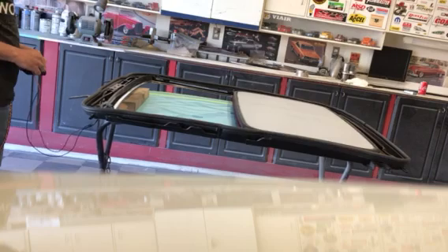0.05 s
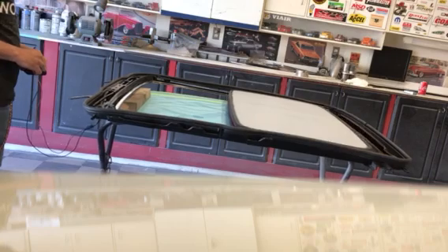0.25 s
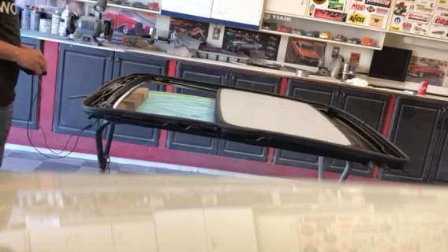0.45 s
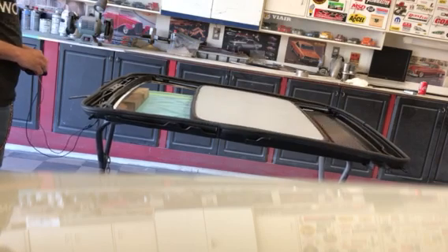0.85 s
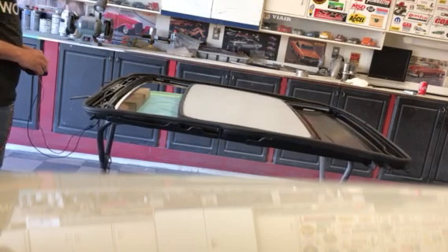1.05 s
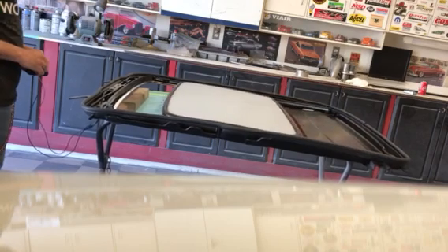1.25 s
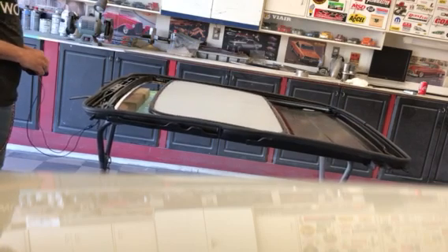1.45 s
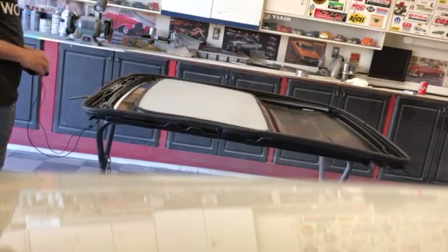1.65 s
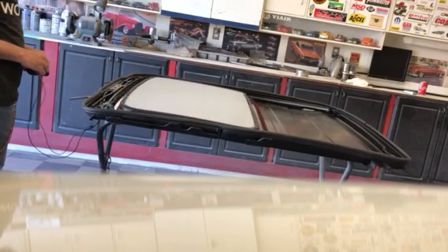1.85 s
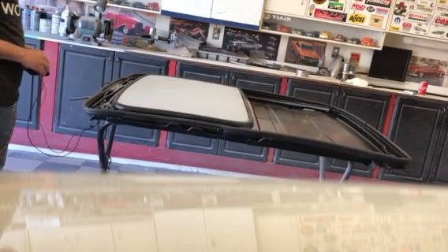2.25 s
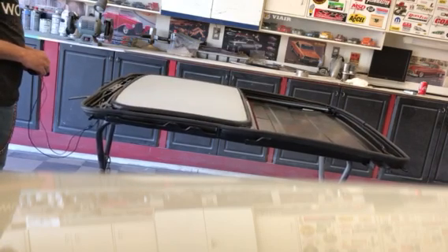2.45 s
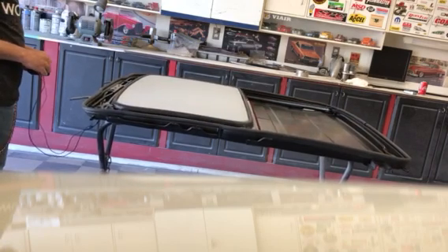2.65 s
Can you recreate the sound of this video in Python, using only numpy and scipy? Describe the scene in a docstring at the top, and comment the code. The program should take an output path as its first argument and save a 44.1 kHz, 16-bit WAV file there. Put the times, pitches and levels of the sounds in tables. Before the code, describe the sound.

A small electric sunroof motor starts at about 0.2 seconds with a rattling clunk and metal clicks. It whirs steadily with a whine and hiss as the panel slides, squealing faintly near 0.4 and from 1.2 to 1.9 seconds. Around 2.1 seconds the panel knocks and scrapes into its seal while the motor turns lower and quieter, stopping with a soft knock near 2.6 seconds. The workshop echoes briefly.

```python
"""A small brush motor slides a sunroof panel shut, on a stand in a workshop.
The glass breaks loose with a clunk; commutator whine, brush hiss and track noise follow the shaft
at about 100 turns a second. Sliding parts squeal, small metal parts snap. The motor drops to a creep,
the panel judders up its ramps into the seal, and the motor stops.
Short room tail, soft steady background, mono."""
import sys
import numpy as np
from scipy import signal
from scipy.fft import rfft, irfft, next_fast_len
from scipy.io import wavfile
from scipy.ndimage import map_coordinates

SR = 44100
rng = np.random.default_rng(int(sys.argv[2]) if len(sys.argv) > 2 else 0)


def log_audio(samples):
    """Write samples as a 16-bit WAV file to the path given in sys.argv[1]."""
    # one column per channel
    frames = np.atleast_2d(samples).T
    # limit to full scale, then quantise
    limited = np.clip(frames, -1, 1)
    pcm = np.round(limited * 32767).astype(np.int16)
    wavfile.write(sys.argv[1], SR, pcm)


N = 123479
TIME_S = np.arange(N) / SR


def drive():
    """Motor and track, all locked to one shaft, in the room."""
    turns, slow, run_up, power = shaft()
    whine = (1 - slow) * run_up * commutator_whine(turns)
    whir = power * motor_whir(turns, slow, run_up)
    noise = power * (brush_hiss(turns, slow, run_up) + track_noise(turns, slow, run_up))
    return workshop(whine, wet_db=-9) + workshop(whir, wet_db=-4) + workshop(noise, wet_db=-6)


# Shaft speed in three phases: time_s, speed_hz
SPIN_UP_SPEED = [(.19, 61.84), (.26, 89.85), (.37, 98.2)]
CRUISE_SPEED = [(0.5, 99.3), (0.604, 101.2), (0.816, 100.2), (0.926, 103.1), (1.062, 102.7), (1.138, 103.2),
                (1.336, 103.3), (1.37, 105.3), (1.608, 102.5), (1.802, 104), (1.956, 101.1), (2.08, 101.6)]
CREEP_SPEED = [(2.15, 97.48), (2.23, 62.74), (2.42, 59.26), (2.559, 57.47), (2.7, 44.9)]
ON_S, OFF_S, RISE_S, STOP_DB_PER_S = 0.1894, 2.55, 0.28, 482
CREEP_HZ, CRUISE_HZ, SPEED_JITTER = 60, 100, 0.00399

def shaft():
    """Turns made, slowness (0 cruise, 1 creep), run-up (0-1) and power gate."""
    speed_hz = timeline(SPIN_UP_SPEED + CRUISE_SPEED + CREEP_SPEED)
    turns = np.cumsum(speed_hz * (1 + SPEED_JITTER * wobble(40))) / SR
    run_up = np.clip((TIME_S - ON_S) / RISE_S, 0, 1)
    slow = np.interp(speed_hz, [CREEP_HZ, CRUISE_HZ], [1, 0]) * (TIME_S > CRUISE_SPEED[-1][0])
    power = (TIME_S > ON_S) * amp(-STOP_DB_PER_S * np.maximum(TIME_S - OFF_S, 0))
    return turns, slow, run_up, power


# Whine envelopes at twice the bar rate and at the bar rate: time_s, relative_db
OCTAVE_LEVEL = [(0.3, -40.5), (.49, -51), (.535, -36.5), (.57, -65), (.64, -39), (.7, -62), (.78, -50),
                (.85, -50), (1.07, -41.5), (1.17, -56), (1.28, -39), (1.36, -55), (1.5, -40), (1.62, -43.5),
                (1.83, -42), (1.91, -58), (1.96, -46), (2.15, -47)]
BAR_LEVEL = [(.52, -44.5), (.62, -61), (1.12, -50.5), (1.27, -49), (1.97, -45.5), (2.15, -54)]
BARS, WHINE_DB, WAVER_DB = 10, -3.8, 2.1

def commutator_whine(turns):
    """Two wavering tones from the commutator bars; the upper octave leads."""
    def tone(envelope, order):
        gain = amp(WHINE_DB + timeline(envelope) + WAVER_DB * wobble(35.37))
        return gain * np.sqrt(2) * np.sin(2 * np.pi * order * turns)
    return tone(OCTAVE_LEVEL, 2 * BARS) + tone(BAR_LEVEL, BARS)


# Motor harmonics at cruise, at creep and against the seal: shaft_order, relative_db
CRUISE_LINES = [(1, -59.5), (9, -61), (11, -59), (14, -61), (15, -56.5), (16, -53), (17, -58.5), (18, -55),
                (19, -58.5), (30, -65), (42, -67), (51, -64), (52, -64), (60, -63), (70, -67)]
CREEP_LINES = [(4, -57), (8, -55), (9, -54), (10, -46), (20, -58), (40, -61), (50, -66), (60, -64),
               (90, -68), (120, -69)]
SEAL_LINES = [(29, -48), (30, -44.5)]
CRUISE_DB, CREEP_DB = 0.5, -2
SEATED_S, SWELL_DB_PER_S, STRAIN_DB = 2.432, 59, 1

def motor_whir(turns, slow, run_up):
    """Cruise harmonics crossfade to creep; rough lines swell until the seal is pressed home."""
    pressing = amp(STRAIN_DB * wobble(110) - SWELL_DB_PER_S * np.maximum(SEATED_S - TIME_S, 0))
    creep = harmonics(turns, CREEP_LINES, flutter_db=0.5)
    creep += pressing * harmonics(turns, SEAL_LINES, flutter_db=0.5)
    cruise = harmonics(turns, CRUISE_LINES, flutter_db=3)
    return amp(CRUISE_DB) * (1 - slow) * run_up * cruise + amp(CREEP_DB) * slow * creep


def harmonics(turns, lines, flutter_db):
    """Shaft orders, each fluttering on its own."""
    out = np.zeros(N)
    for order, db in lines:
        gain = np.sqrt(2) * amp(db + flutter_db * wobble(8.65))
        out += gain * np.sin(2 * np.pi * (order * turns + rng.random()))
    return out


# Motor housing resonances: centre_hz, half_width_hz, lift_db
HOUSING_MODES = [(3100, 170, 3.5), (4170, 320, 4), (5230, 170, 6), (6250, 170, 4.5), (7080, 180, 4),
                 (8950, 200, 3), (9800, 200, 2), (11380, 260, 5.5), (12480, 320, 4.5), (14330, 300, 4.5)]
# Brush contact spectrum: freq_hz, density_db
BRUSH_SPECTRUM = [(1300, -23), (2300, -5), (4200, -2), (5600, -5.5), (7800, -6), (9700, -3), (10700, -5.5),
                  (13000, -2.5), (15700, -6)]
BRUSH_DB, BRUSH_CREEP_DB, BRUSH_START_DB = -40.5, -10.5, -9.5

def brush_hiss(turns, slow, run_up):
    """Brushes rub and the housing resonates; softer at switch-on and at creep."""
    def housing(hz):
        return amp(sum(db * np.exp(-((hz - centre) / width) ** 2) for centre, width, db in HOUSING_MODES))
    level_db = BRUSH_DB + BRUSH_CREEP_DB * slow + BRUSH_START_DB * (1 - run_up) + 0.44 * wobble(13.92)
    hiss = filtered(rubbing(turns, repeat_share=0.8), housing)
    return amp(level_db) * coloured(hiss, BRUSH_SPECTRUM)


# Gear and shoe spectrum: freq_hz, density_db
TRACK_SPECTRUM = [(30, -42), (70, -24), (130, -9.5), (250, -7), (330, -2), (420, -5), (560, -0.5),
                  (750, -2.5), (1000, -3), (1350, -3.5), (1700, -3.5), (2060, -5.5), (2200, -13.5),
                  (3000, -36), (6000, -62)]
TRACK_DB, TRACK_CREEP_DB = -45, -5

def track_noise(turns, slow, run_up):
    """Gears and sliding shoes rub in the track; softer at creep."""
    friction = coloured(rubbing(turns, repeat_share=0.23), TRACK_SPECTRUM)
    return amp(TRACK_DB + TRACK_CREEP_DB * slow) * run_up * friction


def rubbing(turns, repeat_share, orders=260, burst_db=1.5):
    """Contact noise: one rough surface passes every turn, mixed with fresh noise, in uneven bursts."""
    def each_turn(profile):
        return np.interp(turns % 1, np.arange(len(profile)) / len(profile), profile, period=1)
    roughness = rng.standard_normal(orders) + 1j * rng.standard_normal(orders)
    surface = each_turn(unit(irfft(np.r_[0, roughness], 4096)))
    bursts = amp(burst_db * each_turn(unit(rng.standard_normal(40))))
    fresh = rng.standard_normal(N)
    return bursts * (np.sqrt(repeat_share) * surface + np.sqrt(1 - repeat_share) * fresh)


# Blows on the frame: start_s, thud_db, clack_db, tick_db
BLOWS = [(0.219, -50, -41, -42), (.229, -54, -21.5, -43), (.247, -54, -20, -39), (.257, -23.5, -25, -38),
         (0.263, -22, -26, -53), (.276, -30, -28, -41), (0.287, -24, -27.5, -54), (.341, -41, -35, -61),
         (2.012, -41, -38, -45), (2.094, -27.5, -35, -50), (2.109, -25, -32, -41), (2.165, -38, -37, -45),
         (2.21, -34, -27.5, -39), (2.226, -44, -28.5, -44), (2.243, -49, -31, -46), (2.28, -46, -35, -52),
         (2.559, -40, -42, -58)]
# Panel thud, guide clack and guide tick spectra: freq_hz, density_db
THUD_SPECTRUM = [(30, -63), (85, -42), (125, -7.5), (172, 4.5), (205, -5.5), (250, -1), (330, 0),
                 (430, -12), (600, -4.5), (1000, -39), (3000, -59)]
CLACK_SPECTRUM = [(100, -16.5), (350, -3), (560, -9.5), (800, -1), (980, 8), (1200, 0), (1450, -2),
                  (1900, -10.5), (2500, -22), (8000, -37)]
TICK_SPECTRUM = [(500, -30), (2000, 1.5), (3500, 4), (5200, -1), (9000, -8.5), (15000, -25)]
# Frame modes: pitch_hz, relative_db, t60_s
FRAME_MODES = [(91.44, -4.5, 0.67), (173.6, 2, 0.26), (247.3, 1, 0.42), (332.2, -3.5, 0.34),
               (539, -8.5, 0.26), (1014, -10, 0.093)]
THUD_T60_S, CLACK_T60_S, TICK_T60_S, RING_RE_THUD_DB = 0.081, 0.06, 0.13, -15

def knocks():
    """Each blow thuds the panel, rings the frame, and clacks and ticks in the guides."""
    out = np.zeros(N + 2 * SR)
    t = np.arange(SR * 3 // 4) / SR
    def burst(spectrum, t60_s):
        noise = rng.standard_normal(len(t)) * fade(t, t60_s)
        return signal.fftconvolve(noise, impulse_response(spectrum))[:len(t)]
    for start_s, thud_db, clack_db, tick_db in BLOWS:
        blow = amp(thud_db) * burst(THUD_SPECTRUM, THUD_T60_S)
        blow += amp(clack_db) * burst(CLACK_SPECTRUM, CLACK_T60_S)
        blow += amp(tick_db) * burst(TICK_SPECTRUM, TICK_T60_S)
        ring = sum(amp(db) * np.sin(2 * np.pi * hz * t) * rng.choice([-1, 1]) * fade(t, t60_s)
                   for hz, db, t60_s in FRAME_MODES)
        blow += amp(thud_db + RING_RE_THUD_DB) * ring
        out[round(start_s * SR):][:len(t)] += workshop(blow, wet_db=-1.5)
    return out[:N]


# Rubber seal friction spectrum: freq_hz, density_db
SCRAPE_SPECTRUM = [(30, -36), (65, 2), (200, -2.5), (500, 4.5), (1200, -1), (2200, -9), (3300, -9),
                   (6000, -51)]
SCRAPE_FROM_S, SCRAPE_TO_S, SCRAPE_FADE_S = 2.1, 2.27, 0.067
SCRAPE_DB, JUDDER_DB = -40.5, 2.8

def seal_scrape():
    """The panel judders up the ramps against the rubber seal."""
    inside_s = np.minimum(TIME_S - SCRAPE_FROM_S, SCRAPE_TO_S - TIME_S)
    contact = np.clip(1 + inside_s / SCRAPE_FADE_S, 0, 1)
    judder = amp(SCRAPE_DB + JUDDER_DB * wobble(120))
    friction = coloured(rng.standard_normal(N), SCRAPE_SPECTRUM)
    return workshop(contact * judder * friction, wet_db=-6)


# Relay, latch and guide snaps: start_s, level_db, centre_hz, half_width_hz
METAL_SNAPS = [(.198, -40, 6000, 6000), (.226, -40.5, 5100, 220), (.226, -43, 7600, 250),
               (.248, -39, 5150, 350), (.257, -35, 8700, 2200), (.276, -40, 4200, 1500),
               (2.107, -39, 4000, 700), (2.213, -37, 3500, 600), (2.242, -39, 2950, 400)]

def snaps():
    """Small metal parts crack and ping, one resonance each."""
    out = np.zeros(N)
    for start_s, db, centre_hz, width_hz in METAL_SNAPS:
        ring = filtered(rng.standard_normal(N), lambda hz: 1 / (1 + ((hz - centre_hz) / width_hz) ** 2))
        decay = (TIME_S >= start_s) * fade(np.abs(TIME_S - start_s), t60_s=0.035)
        out += amp(db) * unit(ring) * decay
    return workshop(out, wet_db=-10)


# Squeals of the sliding parts: centre_s, length_s, pitch_hz, peak_db, scatter_ratio
SLIDE_SQUEALS = [(.44, 0.14, 12770, -47, .001), (.45, .14, 8840, -54, .001), (1.37, 0.36, 12480, -48, .02),
                 (1.77, .18, 12450, -50, .02)]

def squeals():
    """Sliding parts sing briefly: a thin tone, or a hiss when the pitch scatters widely."""
    out = np.zeros(N)
    for centre_s, length_s, pitch_hz, peak_db, scatter in SLIDE_SQUEALS:
        swell = np.cos(np.pi * np.clip((TIME_S - centre_s) / length_s, -0.5, 0.5))
        cycles = np.cumsum(pitch_hz * (1 + scatter * wobble(500))) / SR
        out += amp(peak_db) * swell * np.sin(2 * np.pi * cycles)
    return out


# Workshop decay: freq_hz, t60_s
ROOM_DECAY = [(100, 0.39), (500, 0.53), (2000, 0.51), (6000, 0.5), (15000, 0.14)]

def workshop(x, wet_db):
    """Diffuse room tail after 5 ms, total power kept."""
    hz, t, bands = signal.stft(rng.standard_normal(SR * 3 // 4), SR, nperseg=256)
    tail = signal.istft(bands * fade(t, along(ROOM_DECAY, hz)[:, None]), SR, nperseg=256)[1]
    response = np.r_[np.zeros(SR // 200), tail / np.linalg.norm(tail)]
    echo = signal.fftconvolve(x, response)[:len(x)]
    return (x + amp(wet_db) * echo) / np.hypot(1, amp(wet_db))


# Workshop background spectrum: freq_hz, density_db
BACKGROUND_SPECTRUM = [(22, -60), (32, -13), (52, 2), (170, -9.5), (300, -7.5), (500, -13), (800, -3),
                       (1000, -2), (1720, -15.5), (2050, -23), (5200, -42)]

def background(level_db=-53.5):
    """Soft, steady, dull noise."""
    return amp(level_db) * coloured(rng.standard_normal(N), BACKGROUND_SPECTRUM)


def amp(db):
    """Decibels to gain."""
    return 10 ** (np.asarray(db) / 20)


def unit(x):
    """Scaled to rms 1."""
    return x / np.sqrt(np.mean(x ** 2) + 1e-20)


def timeline(points):
    """(time_s, value) points read at every sample."""
    return np.interp(TIME_S, *np.transpose(points))


def along(points, hz):
    """(freq_hz, value) points read on a log axis."""
    freq_hz, values = np.transpose(points)
    return np.interp(np.log(hz + 1), np.log(freq_hz + 1), values)


def wobble(rate_hz):
    """Smooth random curve, rate_hz knots a second."""
    return map_coordinates(rng.standard_normal(1024), [np.arange(N) * rate_hz / SR], mode="wrap")


def fade(t, t60_s):
    """Exponential decay."""
    return np.exp(-np.log(1000) * t / t60_s)


def filtered(x, response):
    """Zero-phase filter with gain response(hz)."""
    size = next_fast_len(N + SR // 2)
    return irfft(rfft(x, size) * response(np.fft.rfftfreq(size, 1 / SR)), size)[:N]


def coloured(x, spectrum):
    """x shaped by the spectrum, at rms 1."""
    return unit(filtered(x, lambda hz: amp(along(spectrum, hz))))


def impulse_response(spectrum, size=4096):
    """Minimum-phase response of energy 1."""
    cepstrum = irfft(np.log(amp(along(spectrum, np.fft.rfftfreq(size, 1 / SR)))))
    causal = np.r_[cepstrum[0], 2 * cepstrum[1:size // 2]]
    response = irfft(np.exp(rfft(causal, size)))
    return response / np.linalg.norm(response)


def scene():
    """Mechanism over background, both channels alike."""
    mono = background() + drive() + squeals() + snaps() + knocks() + seal_scrape()
    return np.array([mono, mono])


LOW_CUT_HZ, TOP_HZ = 36, 15850

def record(dry):
    """Deep-bass roll-off and hard band limit."""
    def passband(hz):
        return (hz < TOP_HZ) * hz ** 4 / (hz ** 4 + LOW_CUT_HZ ** 4)
    return np.array([filtered(channel, passband) for channel in dry])


dry = scene()
out = record(dry)
log_audio(out)
```